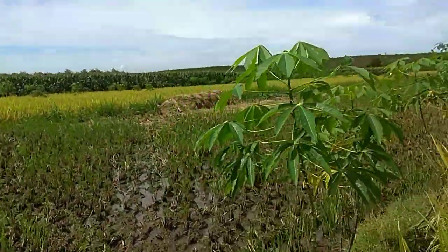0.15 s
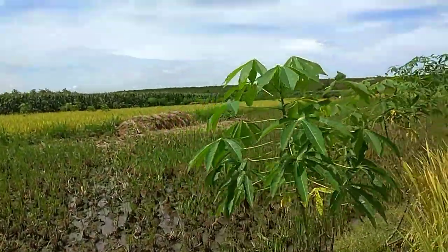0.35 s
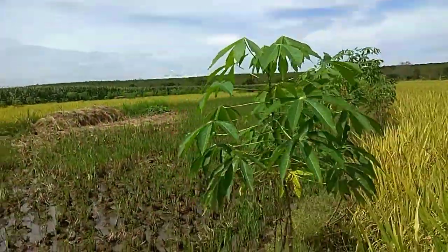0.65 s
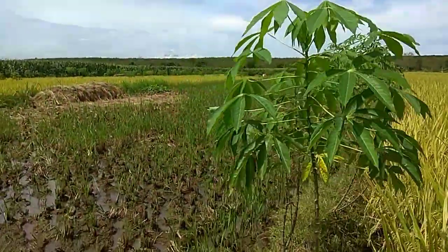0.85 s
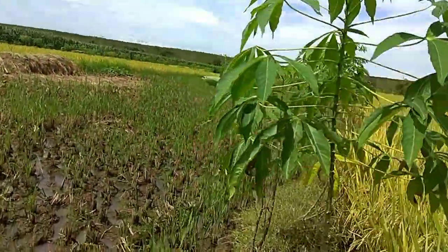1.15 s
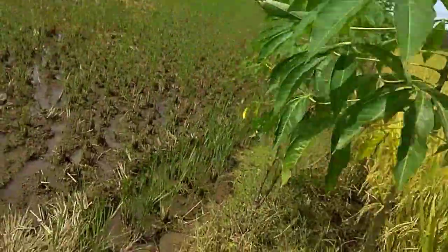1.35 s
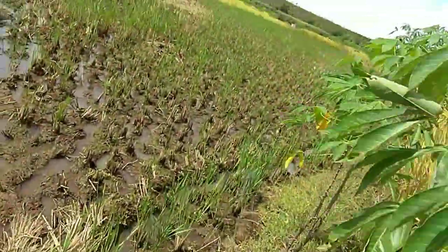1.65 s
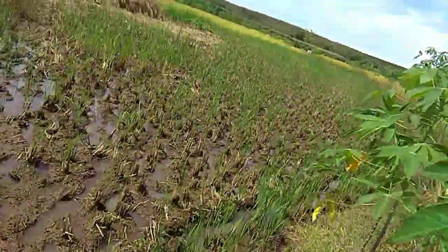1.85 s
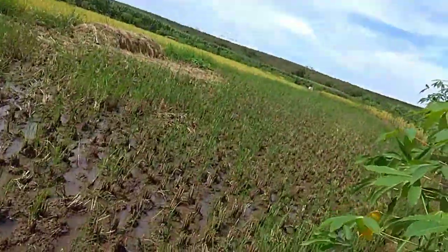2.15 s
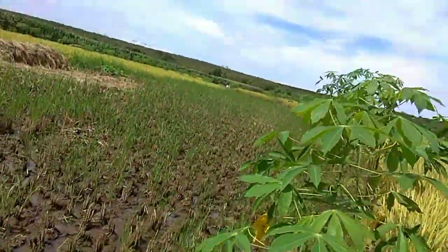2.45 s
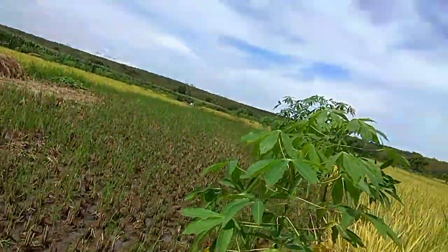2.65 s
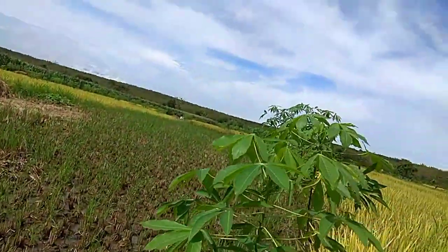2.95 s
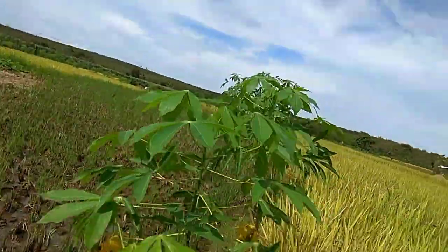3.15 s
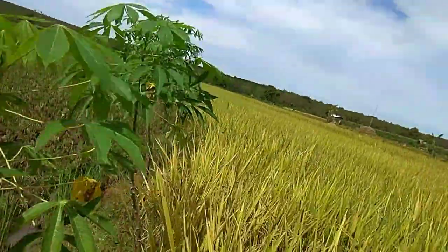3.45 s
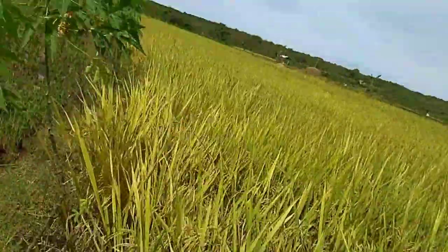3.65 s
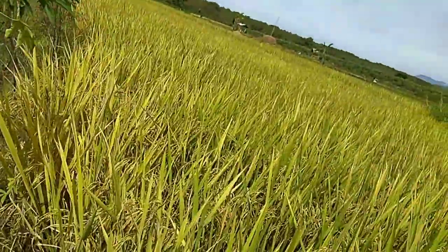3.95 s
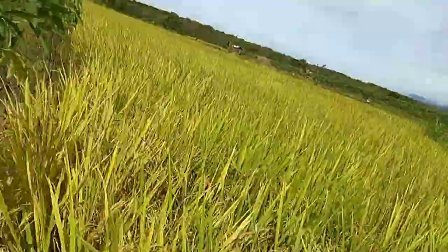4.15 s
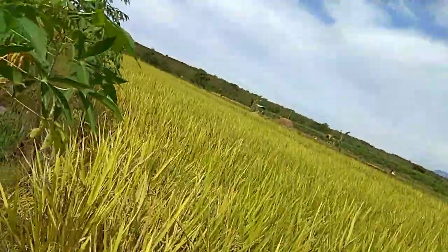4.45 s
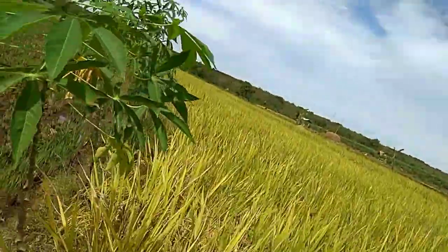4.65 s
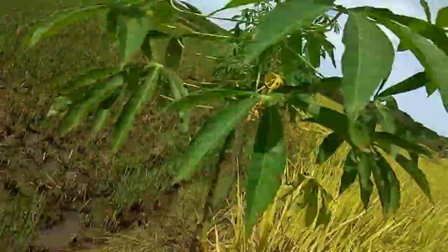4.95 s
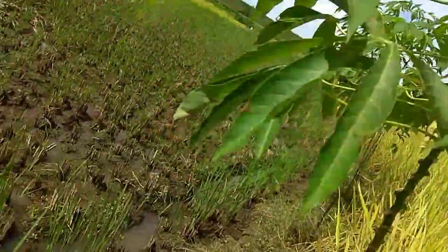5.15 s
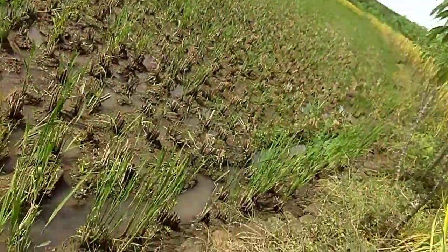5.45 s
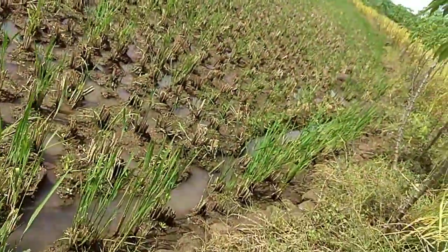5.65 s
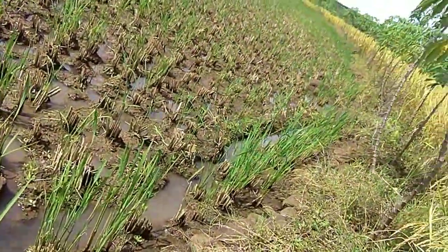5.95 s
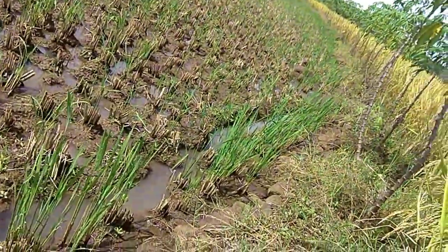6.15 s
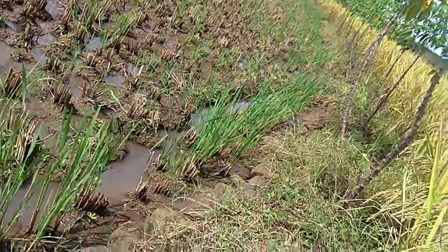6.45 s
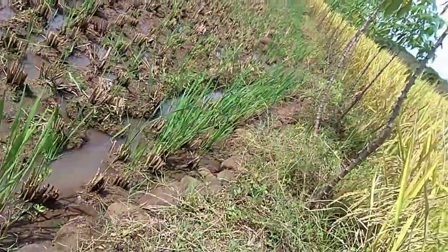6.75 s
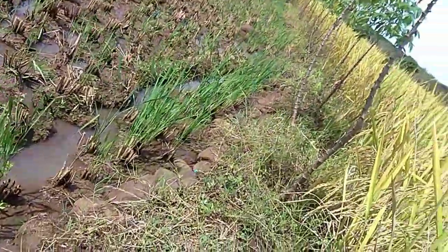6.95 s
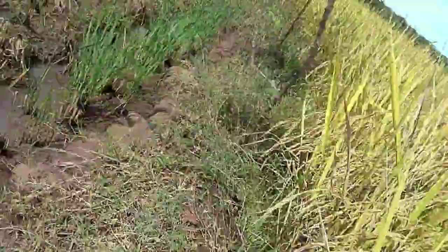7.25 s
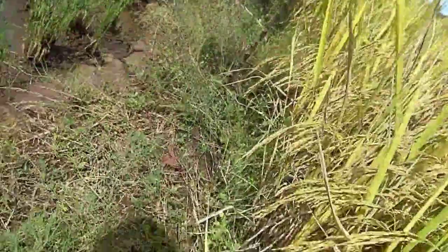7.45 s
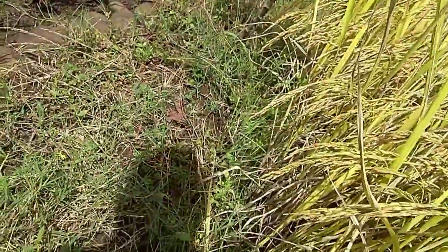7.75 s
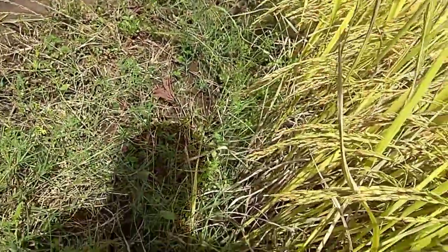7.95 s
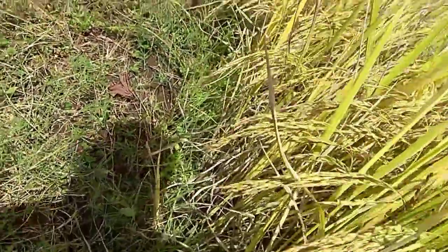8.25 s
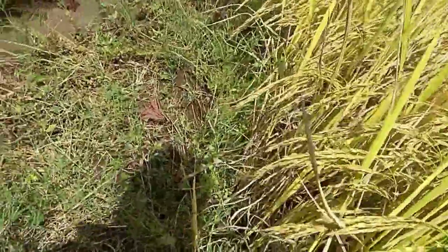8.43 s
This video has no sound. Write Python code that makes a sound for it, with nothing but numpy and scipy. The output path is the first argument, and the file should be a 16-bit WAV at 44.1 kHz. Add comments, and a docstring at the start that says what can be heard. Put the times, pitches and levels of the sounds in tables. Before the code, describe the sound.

Someone wades slowly through dry ripe rice, blades hissing and swishing, husks crackling, stalks snapping sharply, with soft footfalls and faint breeze outdoors.

```python
"""Dry blades and ears of ripe rice sweep along a slow walker's legs and arms: swishes of filtered random ticks.
Husks crackle as short damped rings, stems click as narrow noise bursts, and stiff stalks snap in torn clusters.
Feet and hand give soft knocks, and trodden grass a dull crunch, on a grassy bank beside the crop.
Behind them lie a low rumble of breeze, one gust and a faint far-off drone, all shaped from noise.
Two microphone ports on a hand-held camera give left and right."""
import sys
import numpy as np
from scipy import signal
from scipy.fft import rfft, irfft, next_fast_len
from scipy.io import wavfile
from scipy.ndimage import uniform_filter1d, map_coordinates

SR = 44100
rng = np.random.default_rng(int(sys.argv[2]) if len(sys.argv) > 2 else 0)


def pcm_store(signal):
    """Save signal as 16-bit PCM."""
    levels = np.round(np.clip(np.atleast_2d(signal), -1, 1) * 32767)
    wavfile.write(sys.argv[1], SR, levels.astype(np.int16).T)


N = 378819

# gain of white noise for distant crop and trodden grass: hz, level_db
FIELD_SPECTRUM = [(25, -45), (60, -25), (150, -16.5), (330, 0), (530, -5.5), (800, -8.5), (1200, -13.5),
                  (2700, -11.5), (6000, -21.5)]
TOP_HZ = 15550  # upper limit of the band
SWELL_DB = 24  # a swell's rise or fall time spans this much
SHIVER_DB, SHIVER_T60_S = -17, .032  # what a snapped or slipped stem leaves ringing


def amp(db):
    """A level in decibels is 20 times the logarithm of the gain."""
    return 10 ** (np.asarray(db) / 20)


def unit(x):
    """Normalisation: equal mean power, rms 1."""
    return x / np.sqrt(np.mean(x ** 2) + 1e-20)


def curves(rows):
    """Linear interpolation in time: one value per sample for each column after the time."""
    s, *cols = np.transpose(rows)
    return [np.interp(np.arange(N) / SR, s, c) for c in cols]


def wobble(rate, size=32):
    """Slow random modulation: a smooth curve through rate random knots a second."""
    at = np.arange(0, N + size, size)
    knots = rng.standard_normal(int(N * rate / SR) + 4)
    return np.interp(np.arange(N), at, map_coordinates(knots, [at * rate / SR]))


def sides(pan_db):
    """Level difference between the ports, split evenly; positive is louder on the left."""
    return amp(np.array([[.5], [-.5]]) * pan_db)


def coloured(x, spectrum, size=2048):
    """Minimum-phase filtering: a folded cepstrum makes the wanted gain causal."""
    hz, db = np.transpose(spectrum)
    gain = amp(np.interp(np.log(np.fft.rfftfreq(size, 1 / SR) + 1), np.log(hz), db))
    cepstrum = irfft(np.log(gain))
    cepstrum[1:size // 2] *= 2
    cepstrum[size // 2 + 1:] = 0
    response = irfft(np.exp(rfft(cepstrum)))
    return signal.fftconvolve(x, response[None], axes=1)[:, :x.shape[1]]


def pair(alike, count):
    """Partial coherence: two white noises share the fraction alike of their power."""
    common = rng.standard_normal(count)
    return np.sqrt(alike) * common + np.sqrt(1 - alike) * rng.standard_normal((2, count))


def ticks(per_second, spread_db, size=12):
    """Shot noise: contacts of random strength and sign, up to size samples apart at the two ports."""
    happens = rng.random(N) < per_second / SR
    strength = happens * amp(spread_db * np.clip(rng.standard_normal(N), -2, 2))
    strength = strength * np.sign(rng.standard_normal(N))
    arrival = (np.arange(N) + rng.integers(-size, size + 1, N)) % N
    return unit(np.array([strength, np.bincount(arrival, strength, N)]))


def swell(start, rise, hold, fall):
    """Exponential growth and decay round a hold at 1; also returns the samples covered, out to -72 dB."""
    ends = [(start - 3 * rise) * SR, (start + hold + 3 * fall) * SR]
    first, last = np.clip(ends, 0, N).astype(int)
    t = np.arange(first, last) / SR - start
    before = np.maximum(-t, 0) / rise
    after = np.maximum(t - hold, 0) / fall
    return slice(first, last), amp(-SWELL_DB * (before + after))


def shifting(x, depth_db, size=1024):
    """Time-varying spectrum: random smooth patches of gain over time and frequency."""
    z = signal.stft(x, nperseg=size)[2]
    patches = uniform_filter1d(rng.standard_normal(z.shape[1:]), size=3, axis=0)
    patches = uniform_filter1d(patches, size=5, axis=1)
    gain = amp(depth_db * np.tanh(unit(patches)))
    return unit(signal.istft(z * gain, nperseg=size)[1][:, :N])


def drone(centre_hz=645, width_hz=55):
    """Narrow-band noise: a faint drone from far off, fading in and out."""
    # mean level of the drone: time_s, level_db
    drone_levels = [(0, -71.5), (3, -77), (4.4, -69), (5.1, -68.5), (5.6, -92.5)]
    level_db, = curves(drone_levels)
    band = [(centre_hz / 2, -45), (centre_hz - width_hz, -15), (centre_hz, 0),
            (centre_hz + width_hz, -9), (centre_hz * 2, -65)]
    fading_db = 4.5 * np.tanh(wobble(14))
    return amp(level_db + fading_db) * unit(coloured(pair(0.16, N), band))


def breeze():
    """Turbulent pressure: air rumbles at the ports, stirs the distant crop and buffets in one gust."""
    # mean level of the rumble: time_s, level_db
    breeze_levels = [(0, -61), (2.7, -60.5), (4.7, -62.5), (5.4, -62), (7.6, -61), (8.59, -60)]
    # gain of white noise for the rumble: hz, level_db
    rumble_spectrum = [(25, -30), (55, -34), (80, -19.5), (115, -8.5), (163, 5), (220, -6), (330, -4.5),
                       (480, -20), (800, -66.5)]
    # gain of white noise for the buffeting: hz, level_db
    buffet_spectrum = [(25, -32), (55, -22), (90, -4), (135, 4.5), (200, -3), (400, -12.5), (900, -59)]
    rumble_db, = curves(breeze_levels)
    rumble_db = rumble_db + 1.97 * wobble(12)
    rumble = amp(rumble_db) * unit(coloured(pair(0.78, N), rumble_spectrum))

    field_db = -54.5 - 4 * np.arange(N) / SR  # the murmur dies away by 4 dB a second
    field = amp(field_db) * shifting(coloured(pair(0.02, N), FIELD_SPECTRUM), depth_db=8.0)

    span, push = swell(1.38, rise=0.73, hold=0.54, fall=0.62)  # seconds
    gust = np.zeros(N)
    gust[span] = amp(-55.5) * push
    lumps = amp(4.7 * wobble(27.02))
    buffet = gust * unit(lumps * coloured(pair(0.23, N), buffet_spectrum))
    return rumble * sides(pan_db=-1.6) + field * sides(pan_db=2.0) + buffet * sides(pan_db=-6.5)


def knocks(size=880):
    """Damped impact: a blow of foot or hand gives a dull thud and a rough, hollow scuff."""
    # knocks, both levels before a common trim; decay spans 48 dB:
    # start_s, ring_db, ring_hz, thud_re_ring_db, decay_s
    knock_events = [(2.045, -64, 780, 19.5, 0.03), (2.454, -37, 456, -0.5, 0.048),
                    (2.489, -47.5, 874, 1, 0.045), (2.6094, -47.5, 1105, -6, 0.037),
                    (4.707, -52, 440, 2, 0.057), (5.041, -48, 874, -6, 0.067),
                    (5.412, -51.5, 920, -15, 0.059), (6.746, -42, 900, -6, 0.091),
                    (8.132, -46.5, 1100, 0, 0.081), (8.36, -52, 776, -0.5, 0.13)]
    # gain of white noise for the thud: hz, level_db
    thud_spectrum = [(25, -56), (60, -22), (110, 1), (200, 10.5), (450, -0.5), (750, -41), (4000, -70)]
    trim_db = -6.5
    out, t = np.zeros((2, N + SR)), np.arange(SR // 5) / SR
    for s, db, ring_hz, thud_db, decay_s in knock_events:
        build_up = 1 - np.exp(-t / (0.2 * decay_s))
        push = build_up * amp(-2 * SWELL_DB * t / decay_s)
        hollow = [(ring_hz / 10, -40), (ring_hz * 0.83, -8), (ring_hz, 0),
                  (ring_hz * 1.116, -12), (ring_hz * 3, -24), (SR / 2, -48)]
        ring = coloured(push * pair(0.17, len(t)), hollow)
        thud = coloured(push * pair(0.68, len(t)), thud_spectrum)
        ring = ring / ring[:, :size].std()
        thud = amp(thud_db) * thud / thud[:, :size].std()
        out[:, round(s * SR):][:, :len(t)] += amp(db + trim_db) * (ring + thud)
    return out[:, :N]


def treads():
    """Compression of loose fibres: matted grass gives under a foot in a dull crunch of many ticks."""
    # feet pressing the grass flat: start_s, level_db
    tread_events = [(4.18, -55), (5.04, -63.5), (6.80, -47.5), (8.14, -60.5)]
    weight = np.zeros(N)
    for s, db in tread_events:
        span, push = swell(s, rise=0.043, hold=0.08, fall=0.18)  # seconds
        weight[span] += amp(db) * push
    return weight * unit(coloured(ticks(2500, spread_db=2.0), FIELD_SPECTRUM))


def clicks(size=90, click_t60_s=0.0016):
    """Stick-slip release: a stem slips off its neighbour and rings briefly round its own pitch."""
    # clicks of stems and husks: start_s, level_db, pitch_hz, left_re_right_db
    click_events = [(2.055, -43.5, 1570, 4), (2.471, -34.5, 4270, -6), (2.6112, -51.5, 3000, -6),
                    (2.8418, -54, 3300, -7), (3.459, -38, 9500, -7), (3.4702, -41, 8570, -12),
                    (3.621, -32, 9300, -5), (5.482, -31, 4000, 3), (6.6805, -39.5, 11000, -5),
                    (6.8053, -28, 4500, 3), (7.085, -38, 12000, -6), (8.0018, -42.5, 4970, 7),
                    (8.3908, -36, 3800, 4)]
    out, t = np.zeros((2, N + SR)), np.arange(SR // 10) / SR
    for s, db, ring_hz, pan_db in click_events:
        decay = amp(-60 * t / click_t60_s) + amp(SHIVER_DB - 60 * t / SHIVER_T60_S)
        resonance = [(ring_hz / 3, -40), (ring_hz * .7, -7), (ring_hz, 0),
                     (ring_hz * 1.5, -6), (ring_hz * 3, -18)]
        click = coloured(decay * pair(0.17, len(t)), resonance)
        click = click / click[:, :size].std()
        out[:, round(s * SR):][:, :len(t)] += amp(db) * sides(pan_db) * click
    return out[:, :N]


def snaps(size=220):
    """Brittle fracture: fibres strain, tear in a cluster and leave the stalk shivering; thick ones are darker."""
    # snapping stalks, tearing time being a fall of 60 dB:
    # crack_s, level_db, left_re_right_db, tilt_db_per_octave, tearing_s
    snap_events = [(1.2225, -46, -12, 1, .003), (2.4601, -39, -11, -1.5, 0.0087),
                   (2.4638, -30.5, 0, -5, 0.0019), (4.236, -28, 8, 6, .013), (5.4105, -30.5, 2, 0.5, .016),
                   (6.267, -32, 11, 3, .04), (6.3307, -30, 6, 4.5, .008), (6.4248, -40, 5, -3.5, 0.018),
                   (6.621, -37, 2, 1, 0.0046), (6.7363, -16, 0.5, 0.3, .0008), (7.0134, -21.5, 0, 1, .004),
                   (7.016, -23, 3, 0, 0.0033), (7.223, -38, 8, 0.5, .012), (8.1435, -42.5, 8, -8, 0.0034),
                   (8.391, -39, 8, -1, 0.0016)]
    # gain for a snap before its tilt: hz, level_db
    snap_spectrum = [(50, -68), (300, -34), (1200, -9.5), (2500, -8), (4000, -12), (6500, -3.5),
                     (9500, 10.5), (12500, 7.5), (16000, 6)]
    lead_s, build_up = 0.0092, .6  # strain before the crack; its build-up as a share of the tearing time
    out, t = np.zeros((2, N + SR)), np.arange(SR // 10) / SR - lead_s
    for s, db, pan_db, tilt_db, tearing_s in snap_events:
        tearing = amp(-60 * np.maximum(t, -t / build_up) / tearing_s)
        fibres = np.sign(pair(.3, len(t))) * amp(3 * rng.standard_normal(len(t)))
        shiver = (t > 0) * amp(SHIVER_DB - 60 * t / SHIVER_T60_S) * pair(0, len(t))
        tilted = [(hz, level + tilt_db * np.log2(hz)) for hz, level in snap_spectrum]
        snap = coloured(tearing * fibres + shiver, tilted)
        # same energy as size samples of rms 1
        snap *= np.sqrt(size) / np.linalg.norm(snap, axis=1, keepdims=True)
        out[:, round((s - lead_s) * SR):][:, :len(t)] += amp(db) * sides(pan_db) * snap
    return out[:, :N]


def crackles(count=160, size=256):
    """Poisson impacts on light resonators: each husk gives a damped sine of its own pitch and strength."""
    # runs of scraping husks and stubble, level being typical and before the last filter:
    # start_s, length_s, level_db, centre_pitch_hz
    crackle_runs = [(1.062, 0.035, -42.5, 2220), (1.159, 0.048, -41.5, 1700), (2.007, .07, -41.5, 2010),
                    (3.429, 0.27, -31, 7500), (4.079, 0.26, -26, 8040), (4.527, 0.34, -38, 7040),
                    (5.42, 0.24, -37.5, 4970), (6.235, 0.22, -44, 11000), (6.807, 0.058, -25.5, 4650),
                    (6.862, 0.07, -31, 5200), (8.114, 0.061, -37, 3050)]
    per_second, spread_db = 400, 3.5
    spread_octaves, decay_cycles = 0.3, 1.3
    out, n = np.zeros((2, N + SR)), np.arange(size)
    for s, length, db, centre_hz in crackle_runs:
        when = np.cumsum(rng.exponential(size=count)) / per_second
        within = when < length
        scatter = np.clip(rng.standard_normal((count, 3)), -2, 2)[within]
        pitch, strength, side = scatter.T[:, :, None]
        at = ((s + when[within]) * SR).astype(int)[:, None] + n
        hz = np.minimum(centre_hz * 2 ** (spread_octaves * pitch), TOP_HZ)
        for channel, port in enumerate((1, -1)):
            delay = 2 * (2 - port * side)  # samples; the nearer port hears it sooner and louder
            turns = np.maximum(n - delay, 0) * hz / SR
            gain = amp(db + spread_db * strength + 2 * port * side)
            rings = gain * np.sin(2 * np.pi * turns) * np.exp(-turns / decay_cycles)
            out[channel] += np.bincount(at.ravel(), rings.ravel(), N + SR)
    return coloured(out[:, :N], [(150, -32), (1000, -5.5)])  # the crackles keep out of the bass


def clumps():
    """Amplitude modulation: contacts come in small clumps, a few milliseconds each."""
    return amp(2.2 * wobble(190))


def sweeps():
    """Addition of powers: swishes of blades, ears and straw add to the light contact, left and right."""
    # light contact with the crop between swishes: time_s, blades_db
    contact_levels = [(0, -77), (1.2, -69), (1.65, -72), (1.9, -59.5), (2.7, -80), (3.3, -52.5),
                      (3.95, -59), (4.6, -46.5), (5.35, -55.5), (5.94, -70), (6.2, -54.5), (7.1, -48.5),
                      (8.35, -53), (8.59, -64)]
    # swishes, one for each tuft swept aside; rise and fall span 24 dB:
    # full_s, rise_s, hold_s, fall_s, blades_db, ears_re_blades_db, straw_re_blades_db, left_re_right_db
    swish_events = [(0.01, 0.16, 0.041, 0.25, -45.5, -17, -15.5, -4),
                    (0.36, 0.17, 0.09, 0.36, -46.5, -13.5, -13.5, 0),
                    (0.61, 0.24, 0.062, 0.74, -48.5, -13, -14.5, -6.5),
                    (1.068, 0.043, 0.027, 0.17, -49, -8.5, -9.5, 3.5),
                    (1.14, 0.1, 0.032, 0.19, -44, -11, -8, 0), (1.35, 0.26, 0.13, 0.18, -54, -8, -7, 0.5),
                    (2.006, 0.065, 0.043, 0.13, -45, -7, -6.5, 1),
                    (2.19, 0.19, 0.02, 0.36, -57, -13, -7.5, 6),
                    (2.452, .006, .012, 0.3, -53, -2, -4.5, -3),
                    (2.837, 0.036, 0.012, 0.2, -55.5, -14, -8, -2),
                    (3.013, 0.33, 0.2, 0.18, -51, -8, -9.5, 0.5),
                    (3.45, 0.17, 0.23, 0.29, -42.5, -4.5, -13, -3),
                    (4.146, 0.46, 0.15, 0.1, -35, -9.5, -17.5, -0.5),
                    (4.785, 0.15, 0.043, 1, -46, -8.5, -13, 5.5),
                    (5.156, 0.069, 0.025, 0.15, -38.5, -11.5, -13, 1.5),
                    (5.424, 0.096, 0.17, 0.2, -40.5, -7, -17.5, 1.5),
                    (5.682, 0.035, 0.077, 0.21, -40.5, -9.5, -23, 1),
                    (6.03, 0.12, 0.22, 0.31, -43.5, -11.5, -20.5, 1.5),
                    (6.28, 0.086, 0.048, 0.22, -39.5, -11.5, -14, 0),
                    (6.59, 0.2, 0.025, 0.47, -43.5, -18, -17.5, 3.5),
                    (6.745, .008, .05, .08, -40, -9, -11, 0.5),
                    (6.808, 0.02, 0.04, 0.27, -34, -4.5, -18, 0.5),
                    (7.257, 0.088, 0.18, 0.29, -40, -12.5, -13, 0),
                    (7.582, 0.24, 0.16, 1, -48, -11.5, -41, -8.5),
                    (8.118, 0.1, 0.022, 0.27, -39.5, -7.5, -16.5, 3)]
    straw_exponent = 0.83  # exponent of the straw's swell
    contact = amp(curves(contact_levels)[0])
    blades, ears, straw = (np.ones((2, 1)) * (amp(db) * contact) ** 2 for db in (0, -7.5, -14.5))
    for s, rise, hold, fall, db, ears_db, straw_db, pan_db in swish_events:
        span, push = swell(s, rise, hold, fall)
        peak = amp(db) * sides(pan_db)
        blades[:, span] += (peak * push) ** 2
        ears[:, span] += (peak * amp(ears_db) * push) ** 2
        straw[:, span] += (peak * amp(straw_db) * push ** straw_exponent) ** 2
    return np.sqrt(blades), np.sqrt(ears), np.sqrt(straw)


def brushing():
    """Friction as dense random contacts: plants slide past in a fine hiss with a dry grain."""
    # gain of the ticks for leaf blades: hz, level_db
    blade_spectrum = [(3000, -62), (6000, -10), (7500, -6), (9000, -1), (10300, 1), (13000, -2),
                      (15500, -5)]
    # gain of the ticks for ears of grain: hz, level_db
    ear_spectrum = [(1500, -41), (2600, -8.5), (3500, -1), (5000, 2.5), (6800, -1), (8500, -0.5),
                    (14000, -56)]
    # gain of the ticks for straw: hz, level_db
    straw_spectrum = [(100, -13.5), (450, 0), (800, -12), (1100, -1.5), (1450, 1.5), (2200, 7.5), (3300, 5),
                      (7000, -23.5)]
    hiss, rasp, crunch = sweeps()
    vigour = (hiss.mean(axis=0) / hiss.max()) ** 0.2  # harder brushing makes more contacts
    catching_db = 0.89 * wobble(55)  # blades catch and let go
    grain = ticks(700 * vigour, spread_db=3.0)  # single hard contacts, heard in every part of the plant

    blade_ticks = shifting(ticks(14000, spread_db=2.0), depth_db=9.5)
    ear_ticks = shifting(ticks(6000, spread_db=3), depth_db=12) * clumps()
    straw_ticks = shifting(ticks(3000, spread_db=3), depth_db=10.5) * clumps()
    blades = unit(coloured(blade_ticks + 0.18 * grain, blade_spectrum))
    ears = unit(coloured(ear_ticks + .36 * grain, ear_spectrum))
    straw = unit(coloured(straw_ticks + .3 * grain, straw_spectrum))
    return (hiss * blades + rasp * ears + crunch * straw) * amp(catching_db)


def scene():
    """Superposition in a free field: all sources add, without echo."""
    background = drone() + breeze()
    contacts = knocks() + treads() + clicks() + snaps() + crackles()
    return background + contacts + brushing()


def record(dry):
    """Band limiting: an ideal low-pass keeps nothing from TOP_HZ upwards."""
    m = next_fast_len(N + SR // 2)
    passed = np.fft.rfftfreq(m, 1 / SR) < TOP_HZ
    return irfft(rfft(dry, m) * passed, m)[:, :N]


dry = scene()
out = record(dry)
pcm_store(out)
```